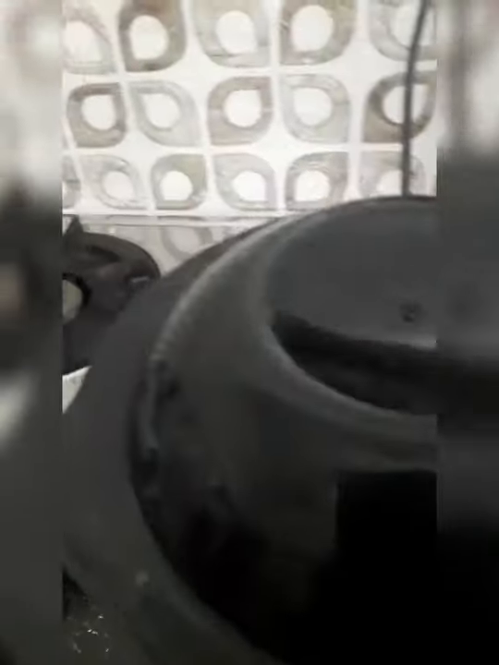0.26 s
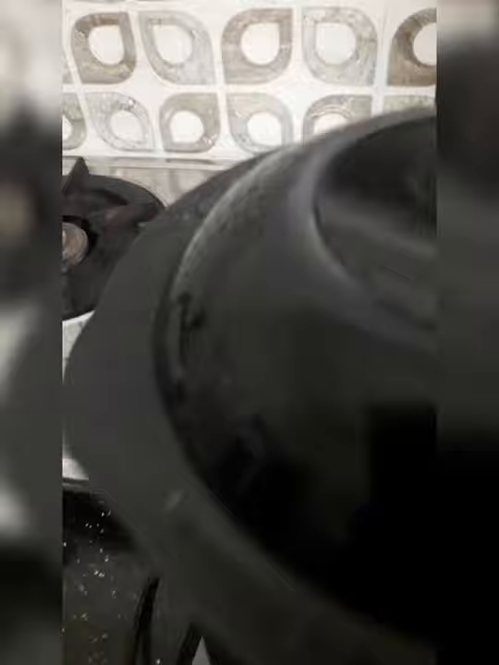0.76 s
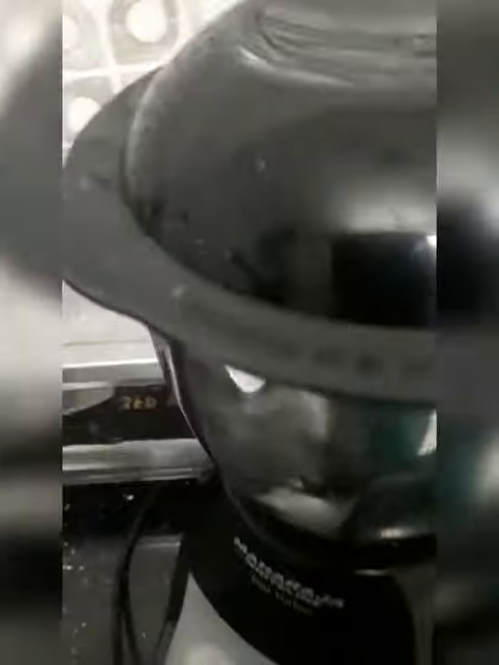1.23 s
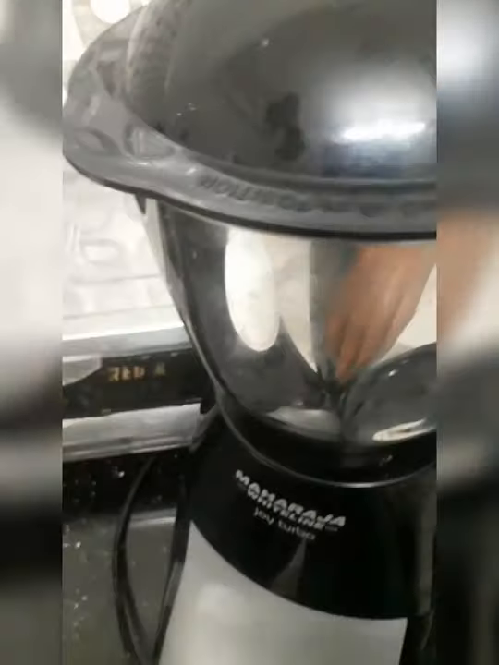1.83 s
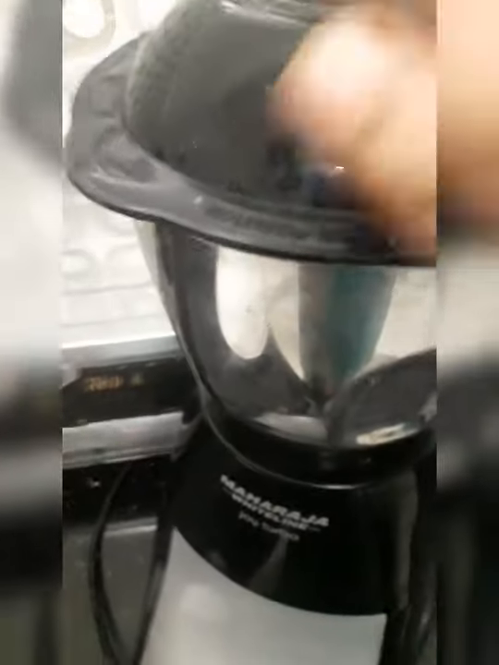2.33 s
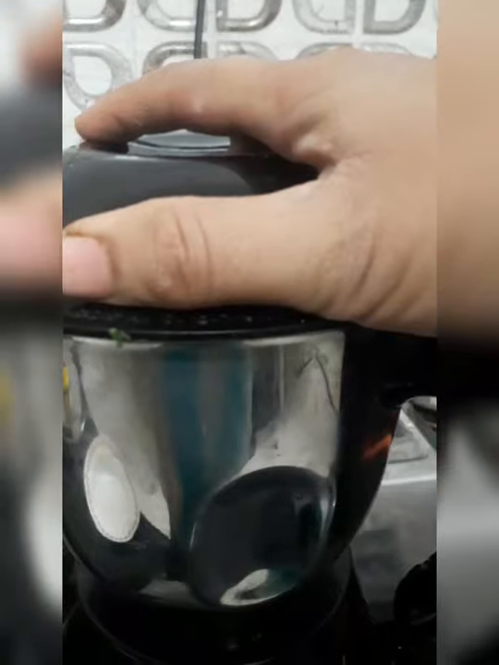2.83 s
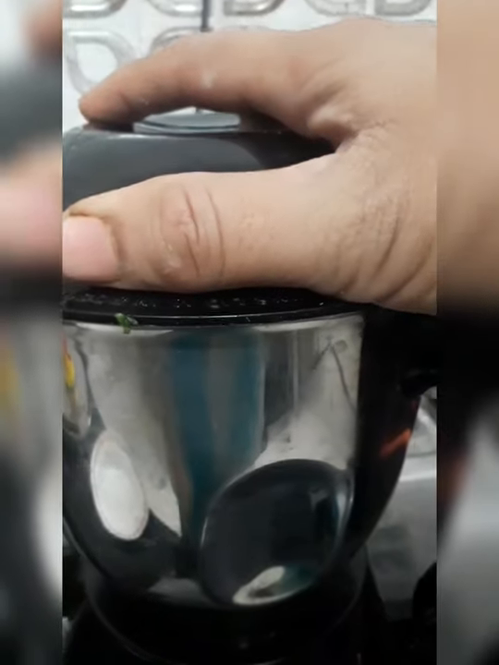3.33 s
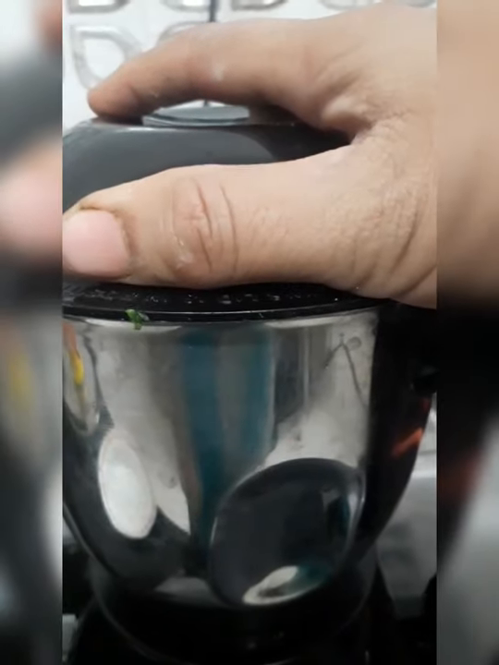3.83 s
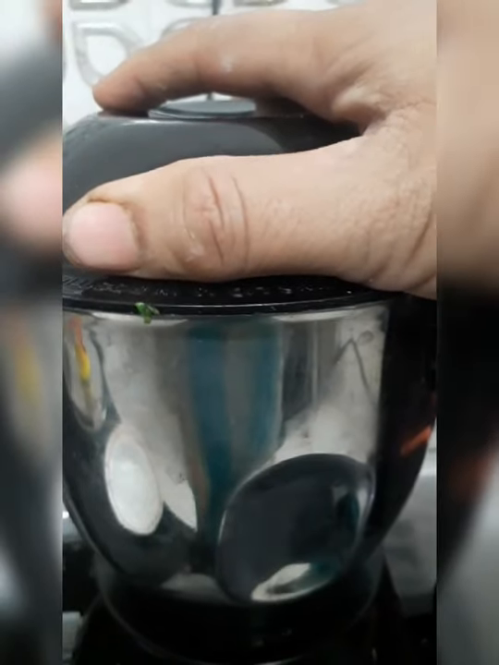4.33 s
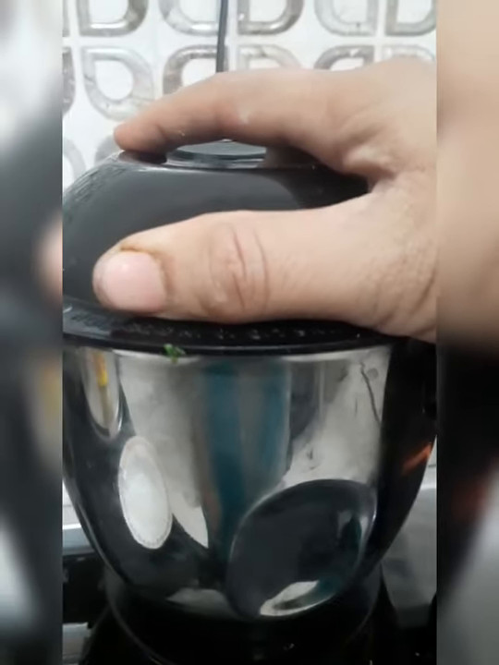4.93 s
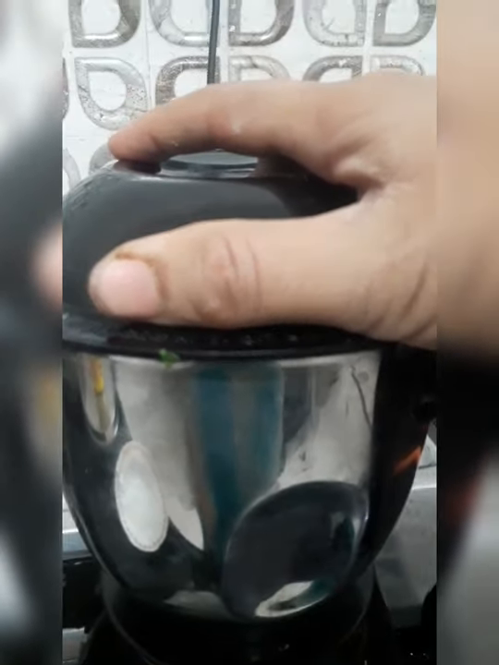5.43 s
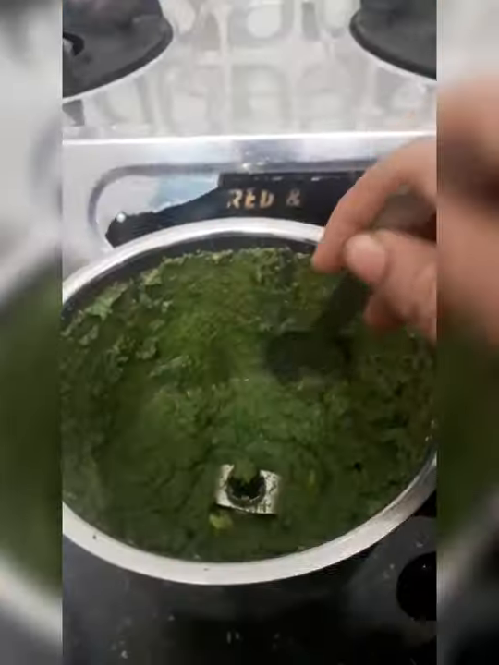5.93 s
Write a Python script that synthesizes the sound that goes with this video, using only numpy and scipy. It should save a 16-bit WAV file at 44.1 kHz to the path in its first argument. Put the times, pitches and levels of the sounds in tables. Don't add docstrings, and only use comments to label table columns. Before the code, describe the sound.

Quiet kitchen murmur and one sharp lid snap, a hard jump to a loud whining mixer grinder churning thick paste, then sudden near-silence.

```python
import sys
import numpy as np
from scipy import signal
from scipy.fft import rfft, irfft
from scipy.io import wavfile
from scipy.ndimage import uniform_filter1d

SR = 44100
rng = np.random.default_rng(int(sys.argv[2]) if len(sys.argv) > 2 else 0)


def dump_mix(stems):
    frames = np.atleast_2d(stems).T
    limited = np.clip(frames, -1, 1)
    pcm = np.round(limited * 32767).astype(np.int16)
    wavfile.write(sys.argv[1], SR, pcm)


def convert_level_to_amplitude(level_db):
    exponent = np.asarray(level_db, float) / 20
    return 10 ** exponent


N = 272097
TIME = np.arange(N) / SR
STEPS = TIME[::128]
CUT_IN_S, CUT_OUT_S = 2.5343, 5.9746

# start [s], speed gain [Hz], sag time [s],
# choke of the sound [dB], loss of top hiss [dB].
SLIPS = [(2.455, 20.5, .31, 1.5, 3), (2.696, 8.8, .074, -1, 2.5), (2.943, 13.2, .15, 5, -1),
         (3.05, 3.2, .046, 1.5, 0.5), (3.2, 8.9, .11, 2, 1.5), (3.467, 20, .18, 3.3, 3.5),
         (3.767, 14.6, 0.099, 4.5, -1.5), (3.88, 5.76, .051, 2.5, -1.5), (4.041, 9.2, .2, 1, 0.5),
         (4.313, 5.55, .089, 0, .5), (4.533, 9.6, 0.0692, 4, -1), (4.696, 9.7, .33, 3, 0),
         (4.981, 5.4, .049, .5, 0.5), (5.449, 7, .04, -0.5, 0), (5.686, 16.1, .052, 1, 0)]


def unit(x):
    return x / np.sqrt(np.mean(x ** 2))


def bell(t, width):
    return np.exp(-(t / width) ** 2)


def bumps(f, peaks):
    return sum(db / (1 + (2 * (f - hz) / width) ** 2) for hz, width, db in peaks)


def decay(t, t60):
    return np.exp(-np.log(1000) * t / t60)


def ring(hz, t60, t):
    return np.sin(2 * np.pi * hz * t) * decay(t, t60)


def walk(rate):
    hold = int(SR / rate)
    w = np.repeat(rng.standard_normal(N // hold + 1), hold)
    w = uniform_filter1d(uniform_filter1d(w, hold), hold)[:N]
    return w / np.std(w)


def colour(x, points, peaks=(), lo_hz=0, hi_hz=SR):
    f = np.maximum(np.fft.rfftfreq(len(x), 1 / SR), 1)
    hz, db = np.transpose(points)
    curve_db = np.interp(np.log(f), np.log(hz), db)
    spec = rfft(x) * convert_level_to_amplitude(curve_db + bumps(f, peaks))
    in_band = irfft(spec * (f > lo_hz) * (f < hi_hz), len(x))
    return irfft(spec, len(x)) / np.std(in_band)


def split(x, lo_hz, hi_hz):
    f = np.fft.rfftfreq(N, 1 / SR)
    low = 1 / (1 + (f / lo_hz) ** 6)
    high = 1 / (1 + (hi_hz / (f + 1)) ** 12)
    spec = rfft(x)
    return [irfft(spec * w, N) for w in (low, 1 - low - high, high)]


def walls(x, t60, wet_db):
    t = TIME[:SR // 4]
    echo = rng.standard_normal(len(t)) * decay(t, t60) * (t > .002)
    echo *= convert_level_to_amplitude(wet_db) / np.sqrt(np.sum(echo ** 2))
    echo[0] = 1
    return signal.fftconvolve(x, echo)[:N]


def quiet_db():
    # start level [dB], fade [dB/s], last-shot level [dB].
    quiet = [-45, -58.5, -56, -80]
    fades = [2.97, .3, 2.15, 1.6]
    last_shot = [-54, -62, -63, -88]
    # centre [s], width [s], rise [dB].
    tap_spurts = [
        (.2, .15, 4),
        (.88, .14, 4),
    ]
    room, rumble, air, hiss = (np.where(TIME < CUT_IN_S, db - fade * TIME, last)
                               for db, fade, last in zip(quiet, fades, last_shot))
    settle = 3.5 * np.exp(-TIME / .25)
    passing_s, passing_width_s, passing_db = 1.12, 0.53, 7.5
    rumble = rumble + passing_db * np.exp(-((TIME - passing_s) / passing_width_s) ** 4)
    tap = sum(db * bell(TIME - s, width) for s, width, db in tap_spurts)
    return room - settle, rumble, air - settle + 0.32 * tap, hiss + tap


def kitchen():
    # frequency [Hz], density [dB per Hz].
    murmur = [(25, -26), (60, -18), (110, 1), (170, -2), (212, -20), (300, -8), (500, -11), (1200, -14),
              (2900, -23), (4600, -28.5), (8600, -45), (9200, -56), (12500, -56), (16000, -57)]
    # frequency [Hz], width [Hz], gain [dB].
    modes = [(137, 19, 4.5), (100, 15, 3), (380, 55, -4), (290, 40, 2), (770, 250, -2.5), (1410, 460, 1.5)]
    room_db, rumble_db, air_db, hiss_db = quiet_db()
    rumble, room, rest = split(colour(rng.standard_normal(N), murmur, modes), 200, 2800)
    _, air, hiss = split(rest, 20, 13000)
    rumble_db = rumble_db + .7 * walk(9.1)
    room_db = room_db + 0.87 * walk(9.03)
    air_db = air_db + 0.47 * walk(12)
    parts = zip((rumble, room, air, hiss), (rumble_db, room_db, air_db, hiss_db))
    return sum(unit(part) * convert_level_to_amplitude(db) for part, db in parts)


def touches():
    # start [s], thud level [dB], tick level [dB], tick pitch [Hz].
    touch_events = [(.388, -75, -58, 8000), (.925, -75, -51, 4800), (2.455, -73, -65, 12010),
                    (.815, -75, -53, 4000), (.972, -75, -58, 4500), (2.114, -75, -60.5, 3000),
                    (2.437, -45, -57, 6000), (2.447, -52, -41, 3400), (2.4855, -30.5, -44, 4200),
                    (2.498, -36, -60, 2000), (6.102, -46, -67, 1500)]
    out, t = np.zeros(N), TIME[:2000]
    for s, thud_db, tick_db, hz in touch_events:
        band = signal.butter(2, [hz / 1.46, hz * 1.26], "band", fs=SR)
        tick = signal.lfilter(*band, rng.standard_normal(len(t))) * np.exp(-t / .003)
        raised = 1.4 if s > CUT_OUT_S else 1
        thud = ring(280 * raised, 0.05, t) + 0.69 * ring(470, 0.022, t)
        out[int(s * SR):][:2000] += convert_level_to_amplitude(thud_db) * thud + 3 * convert_level_to_amplitude(tick_db) * tick
    return out


def lid():
    # frequency [Hz], level [dB], t60 [s].
    snap_modes = [(2400, -14, 0.016), (3360, -10, 0.0095), (4200, 2.5, .012), (4600, 4, .008),
                  (5300, 5, 0.017), (5650, 5, .022), (6600, -13, .012), (9400, -8, 0.015),
                  (11700, -13, .01), (13800, -6, .008)]
    # frequency [Hz], level [dB], t60 [s].
    dome_modes = [(557, -35.5, .15), (690, -36, .09), (470, -50, .06)]
    # frequency [Hz], density [dB per Hz].
    room_colour = [(120, -50), (200, -23), (278, -31), (529, 3), (933, -22), (1080, -5), (1530, -19),
                   (2420, -8.5), (4860, -9), (5330, -4.5), (16000, -34)]
    # frequency [Hz], width [Hz], gain [dB].
    tail_ring = [(5650, 700, 5.5), (4000, 400, 2)]
    snap_s, snap_db, tail_db, tail_t60_s = .4312, -13, -33.5, 0.39
    t = np.maximum(TIME - snap_s, 0)
    t_rattle = TIME[:399]
    band = signal.butter(1, [2800, 13000], "band", fs=SR)
    rattle = signal.lfilter(*band, rng.standard_normal(399)) * t_rattle * np.exp(-t_rattle / 0.0012)
    modes = sum(convert_level_to_amplitude(db) * ring(hz, t60, t) for hz, db, t60 in snap_modes)
    snap = signal.fftconvolve(modes, rattle)[:N]
    snap *= convert_level_to_amplitude(snap_db) / np.abs(snap).max()
    dome = sum(convert_level_to_amplitude(db) * ring(hz, t60, t) for hz, db, t60 in dome_modes) * np.minimum(t / .002, 1)
    tail = colour(rng.standard_normal(N), room_colour, tail_ring) * decay(t, tail_t60_s)
    return snap + dome + convert_level_to_amplitude(tail_db) * tail * np.minimum(t / .003, 1)


def drone():
    passing_s, note_hz, fall_hz_per_s, level_db = 1.12, 148, 30, -59
    t = TIME - passing_s
    hz = note_hz * (1 + .02 * walk(6)) - fall_hz_per_s * np.clip(t, -.6, .6)
    note = np.sqrt(2) * np.sin(2 * np.pi * np.cumsum(hz) / SR)
    return convert_level_to_amplitude(level_db + 2.0 * walk(7)) * bell(t, .5) * note


def shaft_hz(t):
    loaded_hz, thinning_hz_per_s, race_s = 240.05, .854, .12
    hz = loaded_hz + thinning_hz_per_s * (t - CUT_IN_S)
    for s, gain, sag, *_ in SLIPS:
        since = np.maximum(t - s, 0)
        race = np.sin(np.pi / 2 * np.minimum(since / race_s, 1)) ** 2
        hz = hz + gain * race * np.exp(-np.maximum(since - race_s, 0) / sag)
    return hz


def after_slips(sizes, lag, width):
    return sum(size * bell(STEPS - row[0] - lag, width) for row, size in zip(SLIPS, sizes))


def motor():
    # time [s], bite [dB].
    bite_points = [(2.54, 1), (2.8, -1.2), (3.0, 0.4), (3.55, -0.4), (3.95, 0.25), (4.25, 0.95),
                   (4.55, -0.66), (4.9, 0.8), (5.2, 0.5), (5.5, -0.6), (5.97, 0)]
    overtones_db = [-36, -35, -37.5, -33]
    free_db = [1.7, 2.8, 2.9, 3.8]
    nominal_hz, base_roar_db = 249.8, -15.5
    _, gain, _, choke, dull = np.transpose(SLIPS)
    hz = shaft_hz(STEPS)
    bite = np.interp(STEPS, *np.transpose(bite_points))
    free = after_slips(gain / 15, 0.095, .055)
    tone_db = -24.5 + 0.3 * (shaft_hz(STEPS - 0.049) - nominal_hz) - after_slips(choke, .028, 0.032)
    roar_db = base_roar_db + .4 * bite - 0.51 * after_slips(choke, 0.082, 0.052)
    churn_db = base_roar_db + .6 * bite - roar_db
    main_db = [db + 2.3 * bite - .25 * (hz - nominal_hz) - loss * free
               for db, loss in zip(overtones_db, free_db)]
    main_db[0] += 3 * bell(2 * hz - 497, 10)
    splash = 1.5 * after_slips(gain / 15, 0.18, .05)
    hiss_db = 0.35 * bite - after_slips(dull, .06, .08) + splash
    controls = [np.interp(TIME, STEPS, c) for c in (hz, tone_db, roar_db, churn_db, hiss_db, *main_db)]
    return *controls[:5], controls[5:]


def shaft(hz, tone_db, main_db, jar):
    multiples = [5, 6, 7, 10, 11, 18, 19, 2.41, 3.41, 4.41, 5.41]
    multiples_db = [-8, -3, -3, -4, -5, -3, -3, -2, -5, -4, -3]
    turn = 2 * np.pi * np.cumsum(hz * (1 + 0.00101 * walk(40))) / SR
    tones = convert_level_to_amplitude(tone_db + 1.14 * walk(25)) * np.sin(turn)
    for k, db in zip([2, 3, 4, 12], main_db):
        tones += convert_level_to_amplitude(db + 2.2 * walk(16)) * np.sin(k * turn + .3 * walk(12))
    for k, db in zip(multiples, multiples_db):
        resonance_db = bumps(k * hz[::64], jar).repeat(64)[:N]
        swell_db = np.mean(main_db, axis=0) + resonance_db + 2.5 * walk(7)
        phase = .4 * walk(12) + rng.uniform(0, 2 * np.pi)
        tones += convert_level_to_amplitude(db + swell_db) * np.sin(k * turn + phase)
    return np.sqrt(2) * tones


def fan_and_blades(hz, churn_db, hiss_db, jar):
    # frequency [Hz], density [dB per Hz].
    roar_colour = [(25, -75), (60, -57.5), (110, -26.5), (200, -20), (300, -11), (500, -12.5), (1000, -13),
                   (2200, -9), (4700, -6.5), (7000, -11.5), (8600, -21), (10200, -30), (12800, -24.5),
                   (16000, -26)]
    turn = 2 * np.pi * np.cumsum(hz * (1 + 0.00101 * walk(40))) / SR
    beat = 1 + .08 * np.cos(turn) + .15 * np.cos(2 * turn) + .2 * np.cos(3 * turn)
    air = walls(beat * rng.standard_normal(N), .12, -14)
    churn, roar, hiss = split(colour(air, roar_colour, jar, lo_hz=2000, hi_hz=8000), 1900, 9400)
    after_cut = TIME > CUT_IN_S
    churn *= convert_level_to_amplitude(churn_db - np.mean(churn_db[after_cut]) + 1.43 * walk(15))
    hiss *= convert_level_to_amplitude(hiss_db - np.mean(hiss_db[after_cut]) + 1.1 * walk(300) + 0.92 * walk(14))
    roar = sum(part * convert_level_to_amplitude(1.1 * walk(5)) for part in split(roar, 3100, 5400))
    roar *= convert_level_to_amplitude(0.41 * walk(19) + 0.37 * walk(200))
    return churn + roar + hiss


def grinder():
    # [dB, negative = dip].
    jar = [(670, 103, -7), (996, 45, 4), (1081, 38, 5.5), (1710, 20, 0.5), (2980, 40, 3), (3140, 230, -3.5),
           (3344, 66, 4), (3410, 55, -5), (4200, 110, -2.5), (4860, 60, -2.5), (3800, 44, -3),
           (9560, 300, -2), (14200, 900, -4), (1164, 73, -9.5), (1460, 82, 2), (1602, 49, -6),
           (1896, 310, 3.5), (2140, 270, -4), (2740, 45, -1.5), (3820, 310, 2), (4487, 128, 4),
           (4520, 48, -3.5), (4750, 57, 3), (4930, 130, 3), (5560, 87, 1), (6000, 150, -2.5),
           (6250, 100, -5.5), (6700, 100, 3)]
    hz, tone_db, roar_db, churn_db, hiss_db, main_db = motor()
    return shaft(hz, tone_db, main_db, jar) + convert_level_to_amplitude(roar_db) * fan_and_blades(hz, churn_db, hiss_db, jar)


def scene():
    running = (TIME > CUT_IN_S) & (TIME < CUT_OUT_S)
    linger = (TIME >= CUT_OUT_S) * convert_level_to_amplitude(-25) * np.exp(-np.maximum(TIME - CUT_OUT_S, 0) / .0028)
    quiet = kitchen() + touches() + lid() + drone()
    mono = quiet * ~running + grinder() * (running + linger)
    return np.array([mono, mono])


def low_pass(x):
    return signal.sosfilt(signal.butter(12, 17010, fs=SR, output="sos"), x)


def record(dry):
    f = np.fft.rfftfreq(N, 1 / SR)
    top_hz, bass_hz = 15730, 45
    passed = np.exp(-(f / top_hz) ** 250) / (1 + (bass_hz / (f + 1)) ** 2)
    limited = np.tanh(1.214 * dry) / 1.173
    mix = irfft(rfft(limited) * passed, N)
    return low_pass(mix)


dry = scene()
out = record(dry)
dump_mix(out)
```